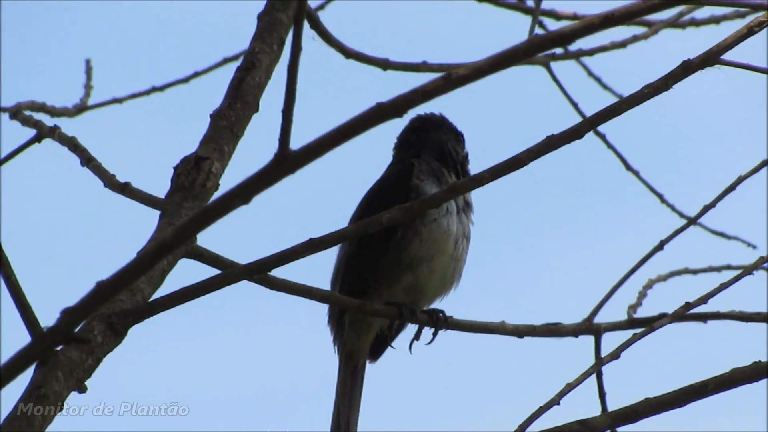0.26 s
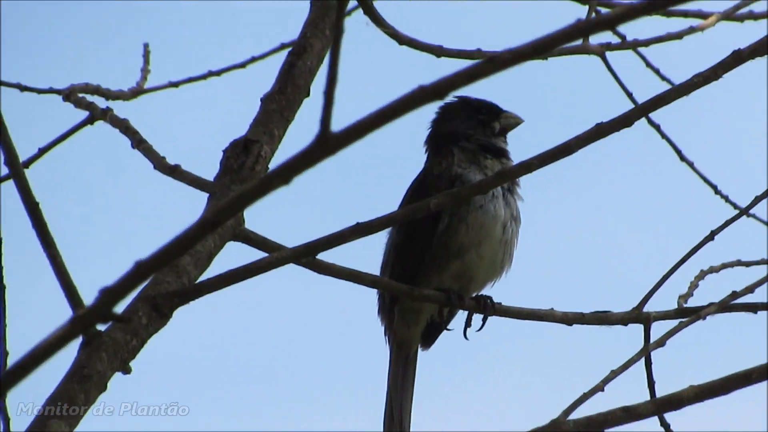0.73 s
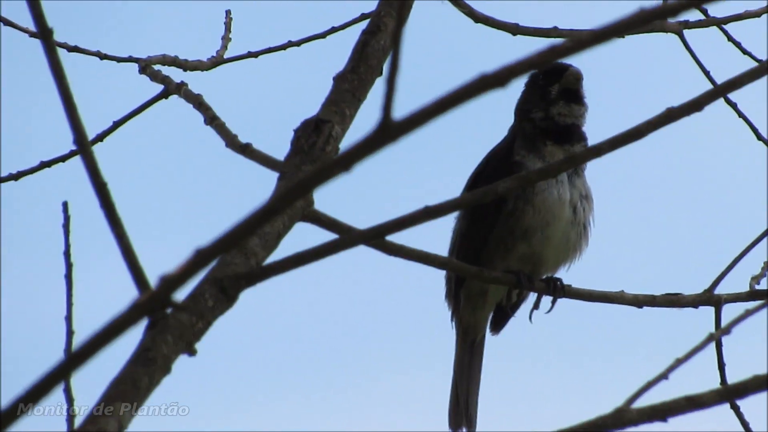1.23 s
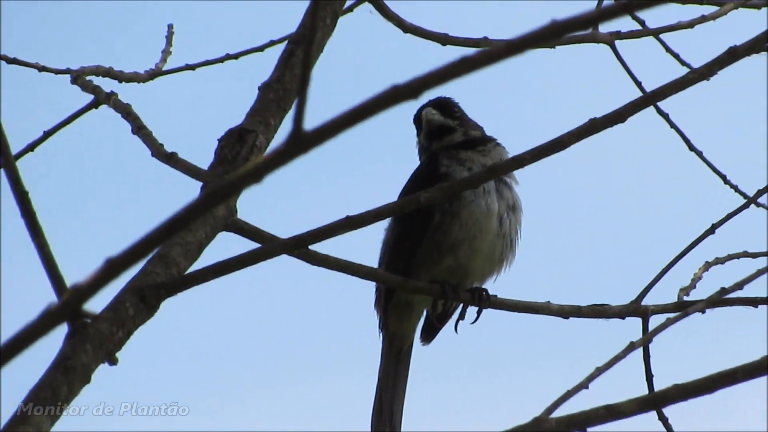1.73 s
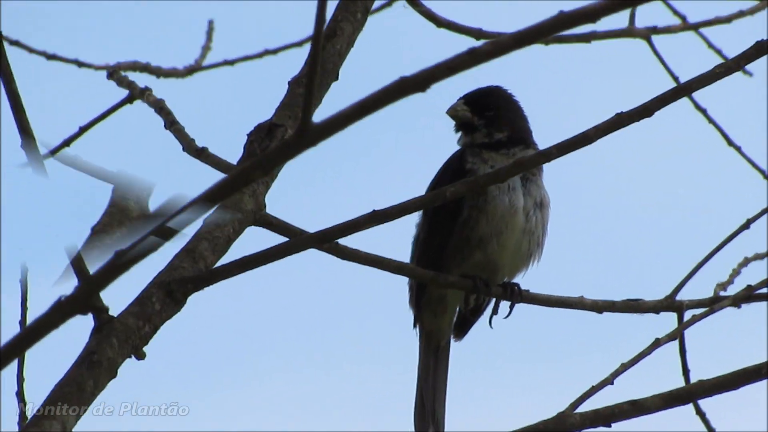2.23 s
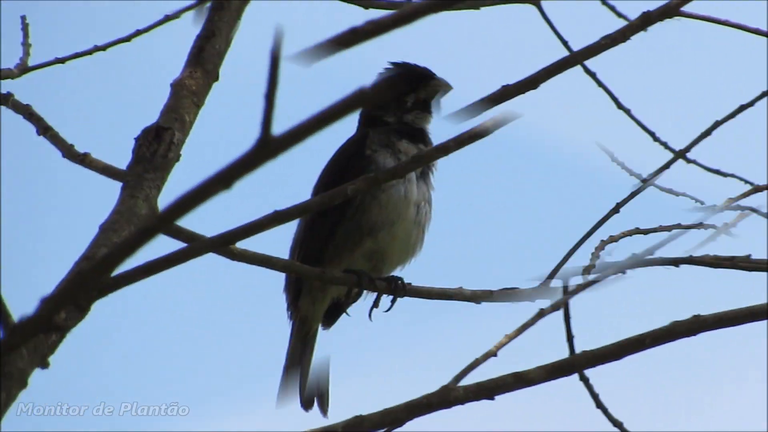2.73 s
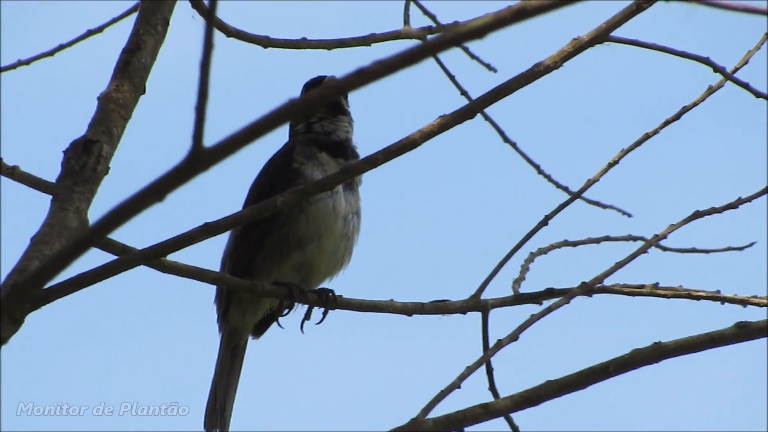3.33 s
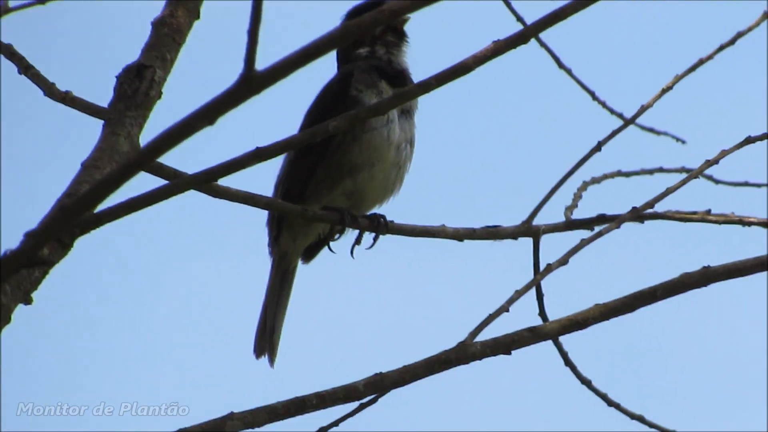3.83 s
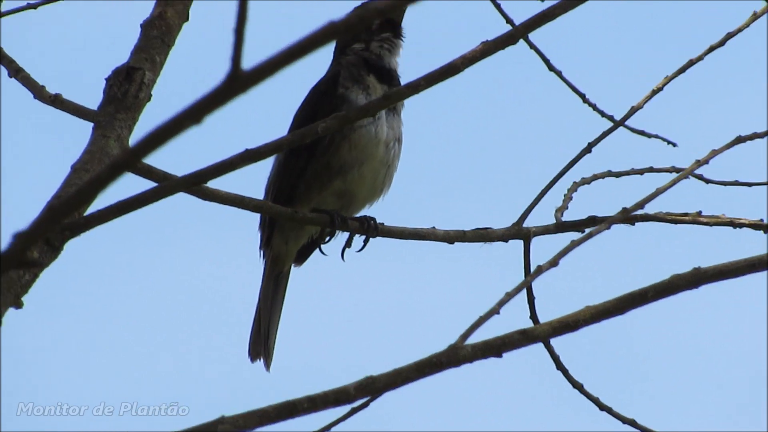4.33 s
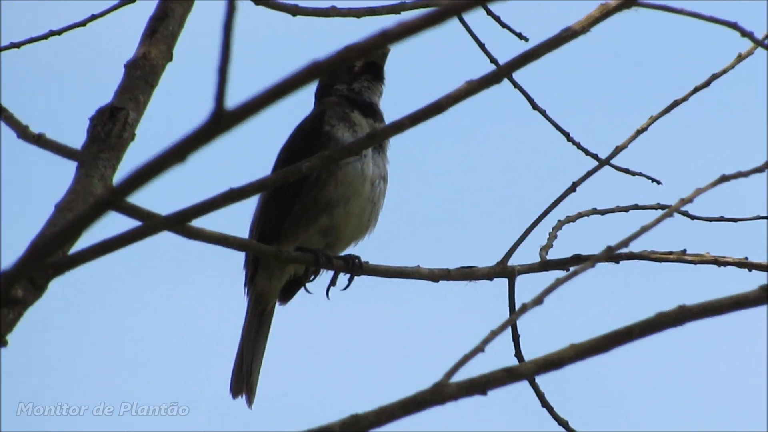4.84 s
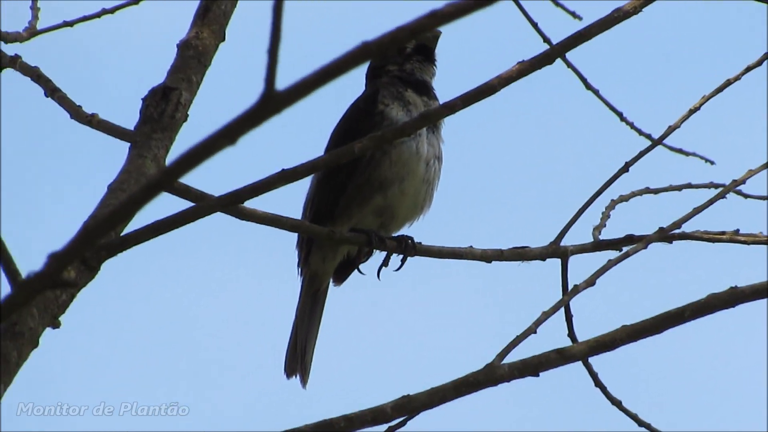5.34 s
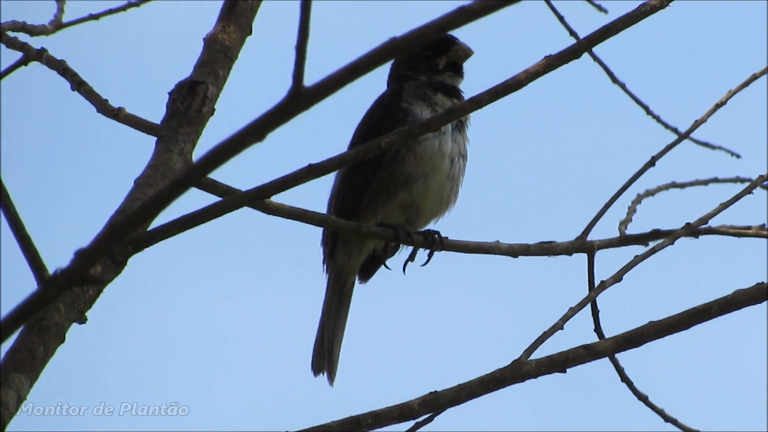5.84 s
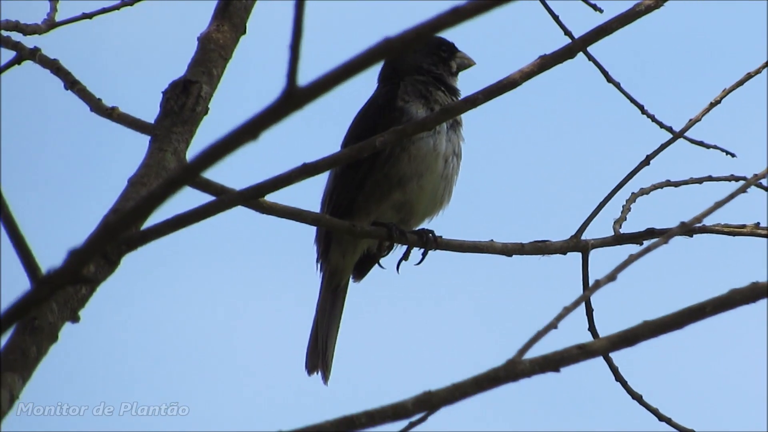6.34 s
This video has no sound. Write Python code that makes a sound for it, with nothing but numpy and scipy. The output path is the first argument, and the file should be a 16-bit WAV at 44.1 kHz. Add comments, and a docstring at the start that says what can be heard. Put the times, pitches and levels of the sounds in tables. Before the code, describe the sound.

Outdoors among trees, uneven gusts of wind thump and rumble on a small stereo microphone over a faint rustle of leaves. A few thin, high bird chips come first. About halfway through, a small songbird straight ahead sings one quick phrase of falling whistles and short buzzes as the hardest gusts hit. The wind then eases and the background turns quieter, leaving a few faint calls from other birds.

```python
"""A seedeater sings one phrase of falling whistles and buzzes from a bare tree; other birds chip and swoop
around it. Gusts thump a small stereo microphone, mostly in opposite sense on its two sides; leaves rustle, an
insect throbs, a far drone hangs below. The sound drops out for a moment, and the background steps down at 3.6
s."""
import sys
import numpy as np
from scipy import signal
from scipy.fft import rfft, irfft, next_fast_len
from scipy.io import wavfile
from scipy.ndimage import uniform_filter1d, map_coordinates

SR = 44100
rng = np.random.default_rng(int(sys.argv[2]) if len(sys.argv) > 2 else 0)


def waveform_to_disk(signal):
    """Save audio, clipped to [-1, 1], as 16-bit WAV at the path in sys.argv[1]."""
    frames = np.transpose(np.atleast_2d(signal))
    scaled = np.clip(frames, -1, 1) * 32767
    samples = np.round(scaled).astype(np.int16)
    wavfile.write(sys.argv[1], SR, samples)


N = 289737

# the singer, one row a note: (start s, length s, from Hz, to Hz, bend of the glide, peak dB, peak at share of
# length)
SONG = [  # the singer's whistles: (start s, length s, from Hz, to Hz, bend of the glide, peak dB, peak at share of length)
    (3.04, .052, 3636, 3730, 1.1, -55, 0.55), (3.097, 0.049, 5330, 4380, 1.65, -45.5, 0.66),
    (3.264, 0.073, 3450, 3658, 5.6, -46, 0.68), (3.337, .07, 5340, 4300, 1.4, -39.5, 0.86),
    (3.458, 0.069, 6550, 4400, 3, -38.5, 0.35), (3.537, 0.063, 6130, 4240, 3.6, -35, 0.89),
    (3.673, 0.13, 4240, 3377, 1.4, -36, 0.37), (3.912, 0.082, 4770, 3010, 1.3, -32.5, 0.34),
    (4.044, 0.016, 3340, 3250, 2.5, -41.5, 0.46), (4.064, .066, 4640, 2605, 1.15, -35, .45),
    (4.128, 0.034, 2578, 2770, .9, -43.5, .5), (4.274, 0.04, 4460, 2970, 1.23, -35, 0.29),
    (4.342, 0.02, 2130, 2280, 2.2, -53, .5), (4.369, .032, 3240, 2120, .6, -50, 0.83)]
# a rasping caller, loudest on its second harmonic: (start s, length s, from Hz, to Hz of the second harmonic,
# bend of the glide, peak dB, peak at share of length)
RASP = [(.43, .036, 4460, 5160, 1.4, -44.5, 0.37), (2.262, 0.0247, 4470, 5020, 1.3, -48, 0.77)]  # a rasping caller, pitch of its second harmonic: columns as above
# thin calls of birds off to the right: (start s, length s, from Hz, to Hz, bend of the glide, peak dB, peak at
# share of length)
CALLS_FAR = [  # thin calls of birds off to the right: columns as above
    (2.278, 0.034, 8300, 8400, 1.5, -54, .4),
    (2.266, 0.075, 6900, 7150, 4.5, -56, .35), (2.335, 0.062, 10400, 6920, 2.4, -47.5, 0.65),
    (2.405, .03, 6860, 6400, .8, -64, .3), (2.676, 0.075, 8200, 6850, 3.1, -52.5, 0.6),
    (3.798, 0.026, 8800, 8830, 1.1, -59, .5),
    (4.335, 0.065, 8900, 7980, 3.7, -59, .4),
    (5.874, 0.028, 3530, 2940, 1.2, -56.5, .5), (6.058, 0.015, 1230, 1500, 1.4, -54.5, .15),
    (6.285, .06, 5960, 5850, .8, -68, .6), (6.36, 0.027, 6890, 7560, 1.3, -58, .6),
    (6.385, 0.027, 7600, 6850, 1.7, -59, .4), (6.4, .032, 7250, 8050, 0.56, -59, .7),
    (6.4, 0.064, 8400, 9150, 4.1, -63, .2), (6.44, .05, 8000, 7900, 1.1, -67, .2)]
# the hardest single gusts: (s, peak dB, Hz, +1 push from the left or -1 from the right, part both sides share dB)
THUMPS = [(0.5506, -24.0, 80, 1, -12), (0.5972, -23.0, 109, 1, -14), (0.6884, -20.0, 107, 1, -23),
          (0.7062, -20.0, 121, 1, -16), (0.7358, -24.0, 78, 1, -11), (0.774, -17.0, 107, -1, -20),
          (1.0775, -25.0, 64, -1, -5), (1.0859, -24, 78, 1, -12), (1.3421, -24, 103, 1, -9),
          (1.6308, -20.0, 121, -1, -14), (2.0357, -16.0, 102, -1, -24), (2.2508, -22, 105, -1, -14),
          (2.5037, -18.0, 113, -1, -16), (2.5347, -20.0, 84, -1, -11), (2.7206, -22.0, 110, -1, -12),
          (2.7839, -18.0, 99, 1, -12), (3.1568, -22.0, 106, 1, -15), (3.429, -19.0, 90, -1, -14),
          (3.4717, -19.0, 109, -1, -13), (3.5558, -12.0, 104, -1, -15), (3.5795, -20.0, 130, -1, -12),
          (3.583, -16.5, 130, 1, -12), (3.5873, -13.5, 163, -1, -12), (3.6545, -21.0, 78, -1, -13),
          (3.782, -11.0, 135, -1, -13), (3.8007, -20.0, 95, -1, -21), (3.9596, -24, 113, 1, -11),
          (4.296, -26, 105, -1, -8), (5.398, -30.0, 64, -1, -11), (5.8722, -22.0, 78, 1, -19)]  # fixed
# small twig ticks: (s, peak dB, Hz)
TICKS = [(.337, -36, 3000), (.350, -37, 6260), (2.148, -46, 6500), (4.811, -51, 5500), (5.049, -46.5, 7000)]
# wind strength: (s, buffet dB of the left-right difference)
BUFFET = [(0, -36.5), (.12, -32), (.3, -42), (.66, -25), (.9, -35), (1.08, -26), (1.22, -37), (1.35, -33.5), (1.5, -36), (1.63, -31), (1.8, -38.5),
          (1.99, -27), (2.12, -35.5), (2.4, -36.5), (2.53, -33.5), (2.76, -30.5), (2.9, -43), (3.08, -39), (3.3, -32.5), (3.55, -35.5), (3.72, -44),
          (3.96, -36), (4.15, -46), (4.29, -37.5), (4.45, -46.5), (5.65, -47), (5.9, -37), (6.1, -46), (6.57, -42)]
# background, stepping at the dropout and again at 3.59 s: (s, drone dB, leaves dB, hiss dB)
AIR = [(0, -47, -51, -55), (.8, -47.2, -51.5, -55.5), (2.09, -46.5, -51.5, -55), (2.12, -48, -55, -57),
       (3.588, -47, -54, -56.5), (3.592, -51.5, -61.5, -62.5), (5.2, -50.5, -61, -62.5), (6.57, -50.5, -61, -62)]
# spectra: (Hz, dB per Hz)
GUST = [(12, -29), (25, -1.5), (50, 2), (90, 2), (140, -8.5), (240, -22.5), (500, -55), (900, -90)]
DRONE = [(30, -51), (70, -3), (130, 2), (250, -0.5), (420, -3), (560, -8.5), (1000, -14.5), (1500, -21), (2500, -32), (5000, -74)]
LEAVES = [(200, -22), (600, -7.5), (1200, -0.5), (2000, -3.5), (4000, -7), (8000, -9), (12000, -24), (16000, -69.5)]
HISS = [(1000, -8.5), (3000, -6.5), (6000, -2.5), (10000, 0), (13000, -4.5), (16000, -10.5)]
WINGS = [(3500, -37), (5500, -19), (8300, 4.5), (10400, 12.5), (11500, -3), (13500, 0), (16000, -16)]
DROPOUT = [(2.087, -4.5), (2.089, -20), (2.096, -14), (2.099, -38), (2.11, -36), (2.113, -65), (2.117, -70), (2.12, -0.5)]  # (s, dB)
TREES = [(2000, 0.27), (3500, 0.5), (5000, 0.55), (10000, 0.15)]  # (Hz, t60 s)
TOP_HZ = 15800  # fixed
TWIG = [(1127, -8, 0.03), (1510, -8, 0.021)]  # (Hz, dB, t60 s)
BUZZ_HZ, BUZZ_TOP_S = 209.9, 3.8701  # fixed
BEAK = [(2000, 0), (7000, -0.5), (7600, -12), (9500, -4), (13000, 5), (16000, 8)]  # the singer's overtones: (Hz, dB)
ECHOES = [(.0031, -10.5), (.0074, -11), (0.014, -14)]  # nearest branches: (delay s, dB)
STEP_S = 3.5894  # gust pulses begun before this moment stop short here
BUZZES = [(3.824, 0.086, 7520, 5170, 1.7, -36, 0.9), (4.209, .065, 5590, 4830, 1.3, -35.5, 0.79)]  # columns as above
SWING_HZ = 520  # pitch swing of a buzz  # fixed
FLICKS_S, FLICK_GAP_S, FLICK_LOSS_DB, FLICK_SAG_HZ = 4.3125, .009, 2, 170  # three quick falling flicks  # fixed
FLICK = (.006, 3200, 2350, 1, -39, .35)  # the first flick: columns as above, after the start  # fixed
PUFF_DB, PUFF_SPREAD_DB, PUFF_HZ = 3, 4, 94  # lesser gusts fall at random, this far over the buffeting
SWELL_S, SWELL_WIDTH_S, SWELL_DB = 1.52, .035, 4.5  # the hiss swells briefly
THROB_RUNS = [(.034, 2.0), (2.417, 6.6)]  # the insect's runs of beats: (first s, end s)  # fixed
THROB_GAP_S = .1576  # fixed
LINGER, SQUARE = 1.3, 2.5  # a whistle dwells on its first pitch; how flat-topped the level arch is
CHIPS = [(2.209, 7730, -42), (3.028, 7480, -38), (4.808, 7800, -36)]  # one sharp chipping bird: (start s, pitch Hz, peak dB)
CHIP_S, CHIP_DROP_HZ, CHIP_BEND, CHIP_PEAK_AT = 0.023, 450, 4.6, .3
PUFF_COMMON_DB = -14.5  # the part of a lesser gust that both sides share
THROB_DB = -61.5
THROB_SPREAD_DB = .7  # fixed
NARROW_HZ_PER_DB = 11  # a buzz swings less while it is still faint


def amp(db):
    """dB to gain."""
    return 10 ** (np.asarray(db) / 20)


def unit(x):
    """Scaled to rms 1."""
    return x / np.sqrt(np.mean(x ** 2) + 1e-20)


def along(points, hz):
    """(Hz, value) points on a log axis."""
    f, v = np.transpose(points)
    return np.interp(np.log(hz + 1), np.log(f + 1), v)


def curves(rows):
    """One value per sample for each column after the time."""
    s, *cols = np.transpose(rows)
    return [np.interp(np.arange(N) / SR, s, c) for c in cols]


def wobble(rate):
    """A smooth random curve, rate knots a second."""
    return map_coordinates(rng.standard_normal(int(N * rate / SR) + 4), [np.arange(N) * rate / SR])


def filtered(x, response):
    """x times a complex response of frequency."""
    m = next_fast_len(N + SR // 2)
    return irfft(rfft(x, m) * response(np.fft.rfftfreq(m, 1 / SR)), m)[..., :N]


def rush(spectrum, side_db, patchy_db):
    """Left and right from unrelated patchy sum and difference noises; the sum has rms 1."""
    z = signal.stft(rng.standard_normal((2, N)), nperseg=512)[2]
    field = uniform_filter1d(uniform_filter1d(rng.standard_normal(z.shape[1:]), 6, 0), 12, 1)
    pair = signal.istft(z * amp(patchy_db * unit(field)), nperseg=512)[1][:, :N]
    mid, side = map(unit, filtered(pair, lambda hz: amp(along(spectrum, hz))))
    return np.array([mid + amp(side_db) * side, mid - amp(side_db) * side])


def whistles(notes, partials, edge, flutter_db, scatter_hz, haze):
    """Sine notes with (multiple, dB) partials. A buzz swings the pitch fast and lifts the overtones.
    The fainter a note, the more the foliage on its way breaks it up and scatters it.
    Returns the direct sound and the sound sent into the trees."""
    out, flutter, waver = np.zeros((2, N)), wobble(170), wobble(700)  # fixed
    for note in notes:
        s, hz, db, swing = np.transpose(note)
        t = np.arange(s[0] - edge, s[-1] + edge, 1 / SR)
        span = slice(round(t[0] * SR), round(t[0] * SR) + len(t))
        depth = np.interp(t, s, swing)
        broken = np.clip((-db.max() - 35.5) / 20, .3, 2)
        pitch = np.interp(t, s, hz) + depth * np.cos(2 * np.pi * BUZZ_HZ * (t - BUZZ_TOP_S))
        phase = 2 * np.pi * np.cumsum(pitch + (scatter_hz * broken + 0.25 * depth) * waver[span]) / SR
        fade = np.clip(np.minimum(t - t[0], t[-1] - t) / (2 * edge), 0, 1)
        size = np.sqrt(2) * amp(np.interp(t, s, db) + flutter_db * broken * flutter[span]) * fade
        out[:, span] += [[1], [broken ** haze]] * size * sum(amp(g + (k > 1) * depth / 110) * (k * pitch < SR / 2) * np.sin(k * phase)
                                for k, g in partials)
    return out


def placed(x, left_db, lag_us):
    """A source off centre: level and arrival differ between the sides (lag of the left)."""
    return filtered(x, lambda hz: [amp(left_db / 2) * np.exp(-1j * np.pi * hz * lag_us * 1e-6),
                                   amp(-left_db / 2) * np.exp(1j * np.pi * hz * lag_us * 1e-6)])


def trees(x, side_db):
    """Trunks and branches scatter back a dense tail, mostly from ahead."""
    hz, t, z = signal.stft(rng.standard_normal((2, SR // 2)), SR, nperseg=256)
    mid, side = signal.istft(z * amp(-60 * t / along(TREES, hz)[:, None]), SR, nperseg=256)[1]
    tail = np.array([mid + amp(side_db) * side, mid - amp(side_db) * side]) / np.linalg.norm(mid)
    return signal.fftconvolve(np.pad(x, (400, 0))[None], tail, axes=1)[:, :N]


def birds():
    """The singer ahead, the rasping caller a little left, the thin calls right; all echo in the trees."""
    song = whistles(song_notes(), [(1, 0.0), (2, -27.5), (3, -31.0)], edge=.003, flutter_db=3.5, scatter_hz=22, haze=0)
    song, song_wet = filtered(song, lambda hz: amp(along(BEAK, hz)))
    # strong early copies beat against a gliding note
    early = filtered(song, lambda hz: sum(amp(db) * np.exp(-2j * np.pi * hz * s) for s, db in ECHOES))
    rasp, rasp_wet = whistles(shaped(RASP, rise_db=9, fall_db=11), [(.5, -3), (1, 0), (1.5, -6)], edge=.004, flutter_db=4, scatter_hz=330, haze=0)  # fixed
    far, far_wet = whistles(far_notes(), [(0.99, 0)], edge=0.0025, flutter_db=2.0, scatter_hz=90, haze=0.67)
    direct = song + early + placed(rasp, 1.8, -10) + placed(far, -1.4, 16)
    return (direct + amp(-12.0) * trees(song_wet, side_db=-11.0) + amp(-12.0) * trees(rasp_wet, side_db=-11)
            + amp(-6.5) * trees(far_wet, side_db=-12.5))


def ticks():
    """A brief crack, broad around its own pitch, and the twig's short ring."""
    out, t = np.zeros(N), np.arange(2000) / SR
    for s, db, hz in TICKS:
        crack = amp(-60 * t / 0.0099) * (np.cos(2 * np.pi * hz * t) + 1.5 * rng.standard_normal(2000))
        ring = sum(amp(level - 60 * t / t60) * np.sin(2 * np.pi * f * t) for f, level, t60 in TWIG)
        out[round(s * SR):][:2000] += amp(db) * (crack + ring)
    return filtered(out, lambda hz: 1 / np.hypot(1, (hz / 9000) ** 2))


def wind():
    """Buffeting, lumpier as it strengthens, plus single pressure pulses, opposite on the two sides with a small
    common part."""
    gust_db = curves(BUFFET)[0]
    lumps_db = 3 * np.clip((gust_db + 45) / 12, 0, 1) * wobble(25)
    buffet = amp(gust_db - 13.5 + lumps_db) * rush(GUST, side_db=12, patchy_db=1)
    mid, side, t = np.zeros(N), np.zeros(N), np.arange(-1000, 1000) / SR
    chance = rng.standard_normal((90, 3))
    when = np.linspace(.05, N / SR - .05, num=90) + .035 * np.tanh(chance[:, 0])  # fixed
    puffs = np.transpose([when, gust_db[(when * SR).astype(int)] + PUFF_DB + PUFF_SPREAD_DB * chance[:, 1],
                          PUFF_HZ * amp(2.5 * chance[:, 2]), np.sign(chance[:, 0]), PUFF_COMMON_DB + 0 * when])
    gusts = THUMPS + list(puffs)
    for (s, db, hz, way, common_db), turn in zip(gusts, rng.normal(0.31, 1.0, len(gusts))):
        alive = 1 if s > STEP_S else np.clip((STEP_S - s - t) / .0012, 0, 1)  # fixed
        bell = way * amp(db) * np.exp(-(1.74 * hz * t) ** 2) * alive
        side[round(s * SR) - 1000:][:2000] += bell * np.cos(2 * np.pi * hz * t + 0.57)  # rebound beats the lead-in
        mid[round(s * SR) - 1000:][:2000] += amp(common_db) * bell * np.cos(2 * np.pi * hz * t + turn)
    return buffet + np.array([mid + side, mid - side])


def background():
    """Far drone, leaves, microphone hiss and a stridulating insect."""
    t = np.arange(N) / SR
    drone_db, leaves_db, hiss_db = curves(AIR)
    hiss_db = hiss_db + SWELL_DB * np.exp(-((t - SWELL_S) / SWELL_WIDTH_S) ** 2)
    beats = np.concatenate([np.arange(first, end, THROB_GAP_S) for first, end in THROB_RUNS])
    sizes = amp(THROB_DB + THROB_SPREAD_DB * rng.standard_normal(len(beats)))
    throb = sum(size * np.exp(-((t - s) / np.where(t < s, .025, .06)) ** 2) for s, size in zip(beats, sizes))
    return (amp(drone_db - 4.0 + wobble(3.026)) * rush(DRONE, side_db=8.0, patchy_db=1.0)
            + amp(leaves_db + 0.63 * wobble(7.0)) * rush(LEAVES, side_db=-16.0, patchy_db=1.0)
            + amp(hiss_db) * rush(HISS, side_db=-0.5, patchy_db=2.1)
            + throb * rush(WINGS, side_db=-12, patchy_db=2.2))  # fixed


def shaped(rows, rise_db, fall_db, swing_hz=0, linger=1):
    """Each row as a note: the pitch glides fast first if bent over 1, the level arches to its peak."""
    u, notes = np.linspace(0, 1, num=24), []
    for s, length, from_hz, to_hz, bend, db, at in rows:
        at = np.clip(at, .05, .95)  # fixed
        arch_db = np.where(u < at, rise_db * abs(1 - u / at) ** SQUARE, fall_db * abs((u - at) / (1 - at)) ** SQUARE)
        notes.append(np.transpose([s + length * u, to_hz + (from_hz - to_hz) * (1 - u ** linger) ** bend, db - arch_db,
                                   np.clip(swing_hz - NARROW_HZ_PER_DB * arch_db, 0, None)]))
    return notes


def song_notes():
    """Whistles, buzzes and the flicks that end the last long fall."""
    length, from_hz, to_hz, bend, db, at = FLICK
    flicks = [(FLICKS_S + k * FLICK_GAP_S, length, from_hz - k * FLICK_SAG_HZ, to_hz - k * FLICK_SAG_HZ, bend,
               db - k * FLICK_LOSS_DB, at) for k in range(3)]
    return shaped(SONG + flicks, rise_db=10.5, fall_db=13.5, linger=LINGER) + shaped(BUZZES, rise_db=17, fall_db=-1.0, swing_hz=SWING_HZ)


def far_notes():
    """The chips share one shape; the other thin calls swell more slowly."""
    chips = [(s, CHIP_S, hz + CHIP_DROP_HZ, hz, CHIP_BEND, db, CHIP_PEAK_AT) for s, hz, db in CHIPS]
    return shaped(chips, rise_db=16.0, fall_db=15.0) + shaped(CALLS_FAR, rise_db=9.5, fall_db=6)


def scene():
    """Everything that reaches the microphone."""
    return birds() + wind() + background() + ticks()


def record(dry):
    """The microphone has a dip in its response; the sound drops out briefly; nothing passes above the band limit."""
    dip = lambda hz: amp(-11 * np.exp(-((hz - 690) / 75) ** 2))
    return filtered(filtered(dry, dip) * amp(curves(DROPOUT)[0]), lambda hz: hz < TOP_HZ)


dry = scene()
out = record(dry)
waveform_to_disk(out)
```